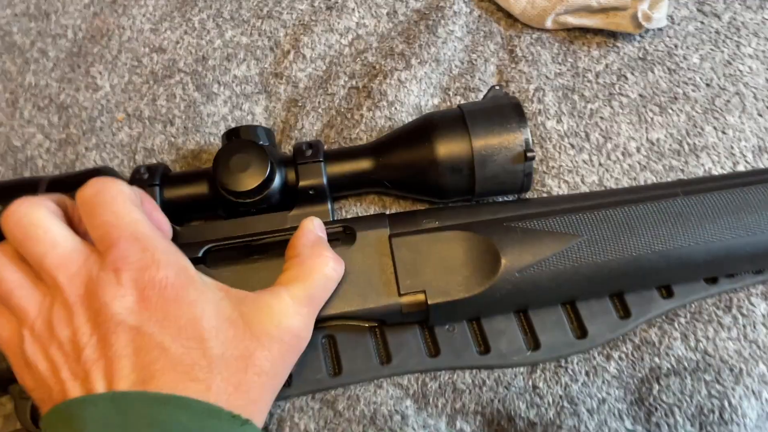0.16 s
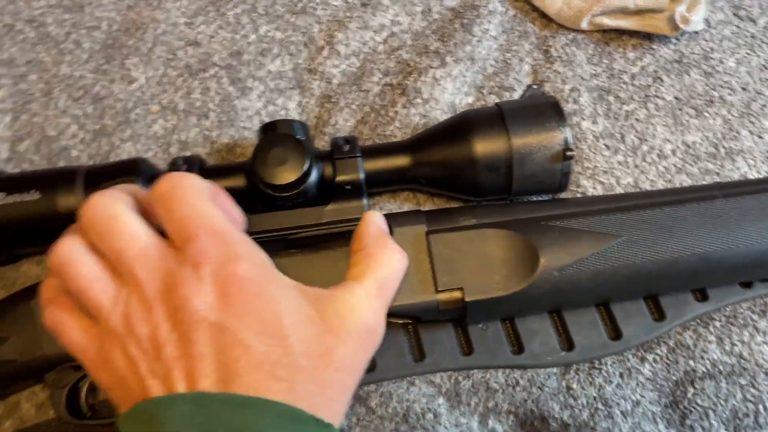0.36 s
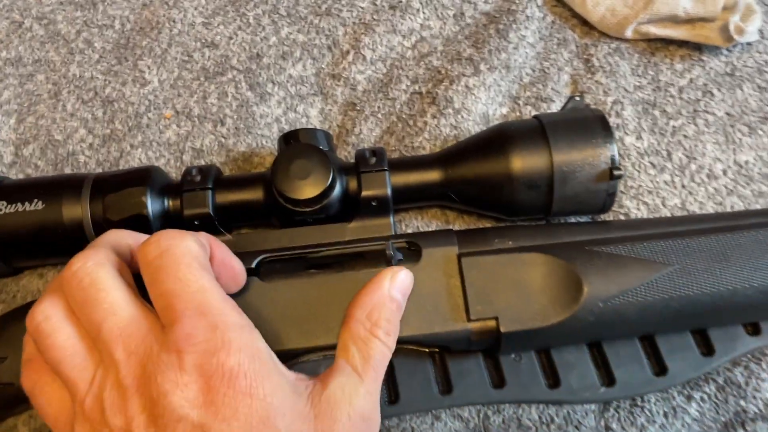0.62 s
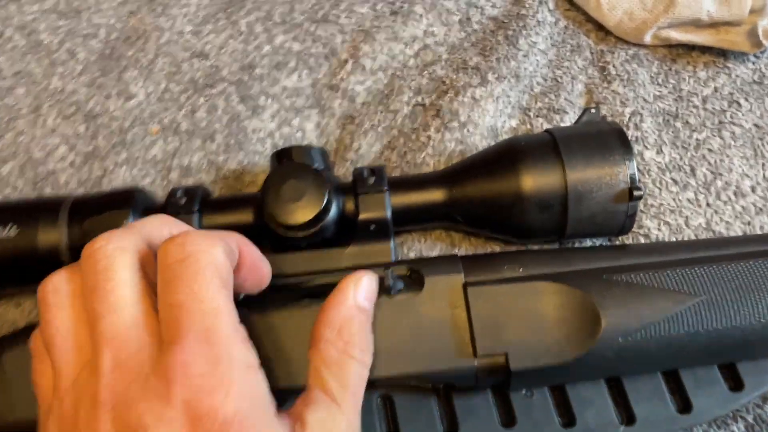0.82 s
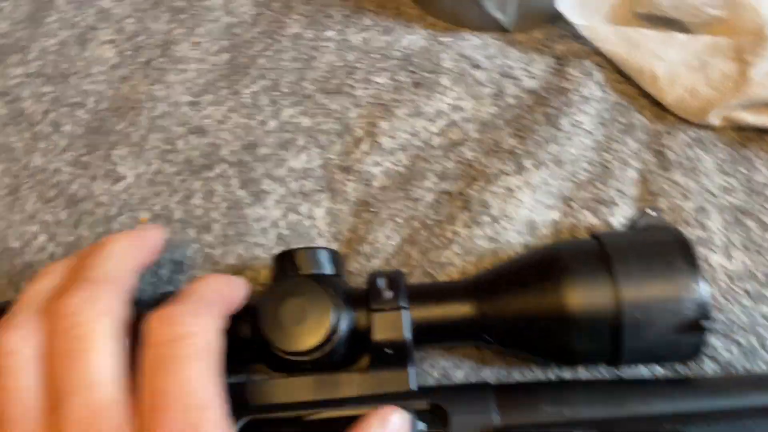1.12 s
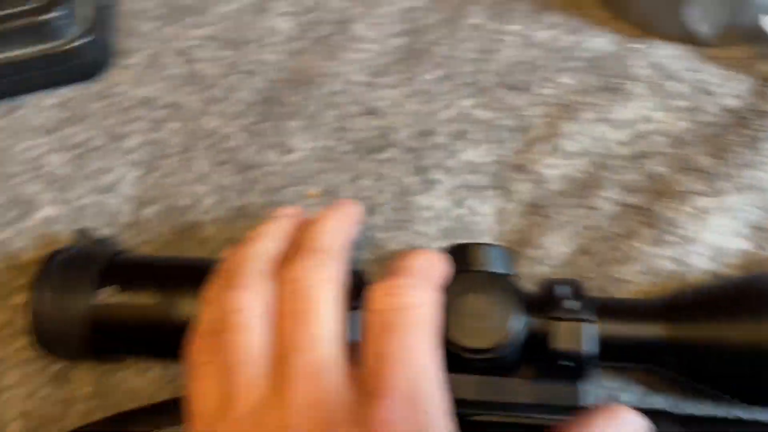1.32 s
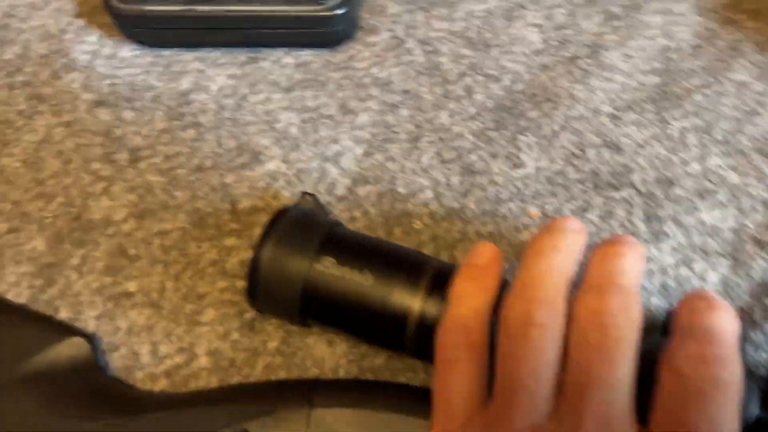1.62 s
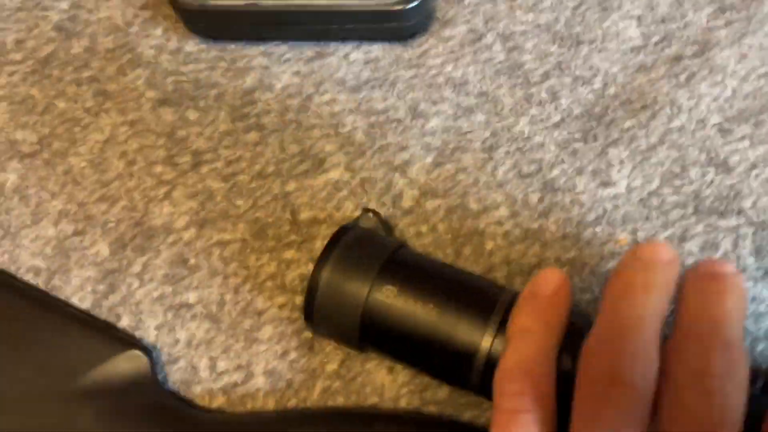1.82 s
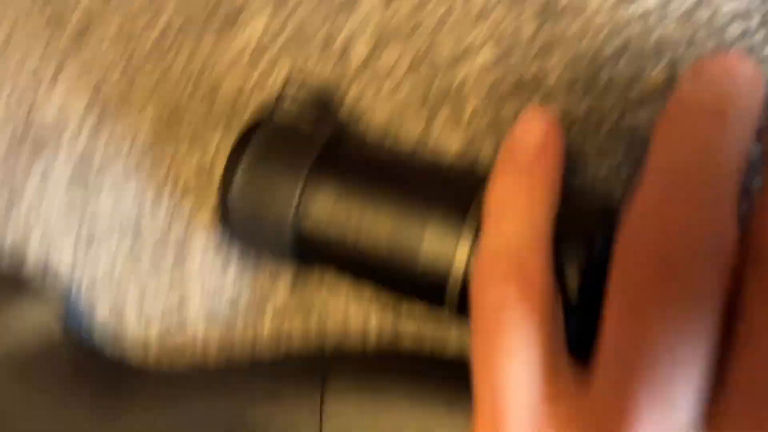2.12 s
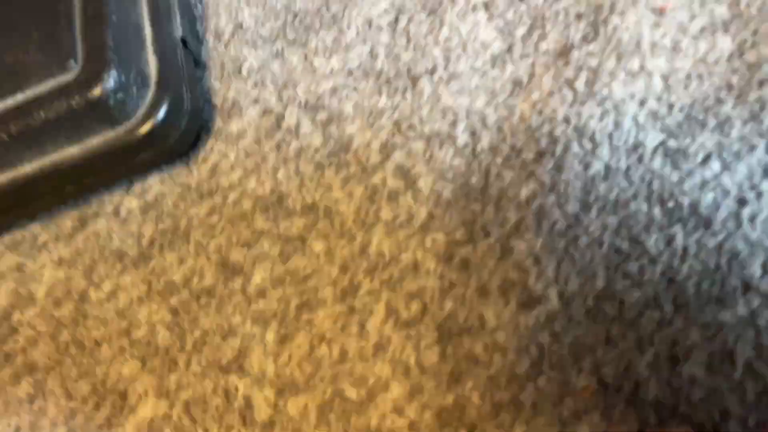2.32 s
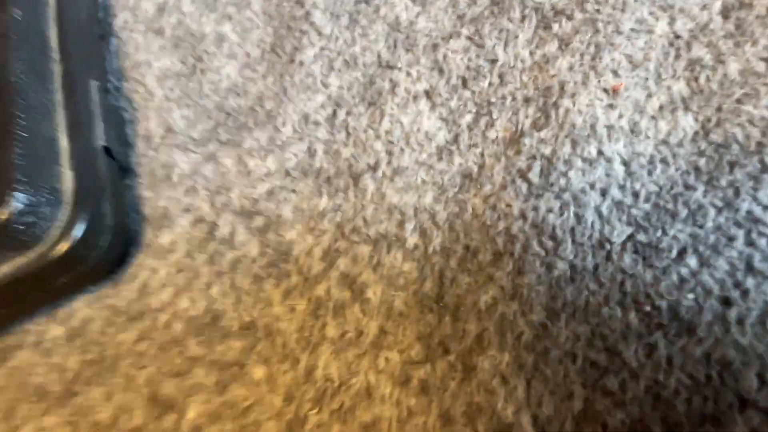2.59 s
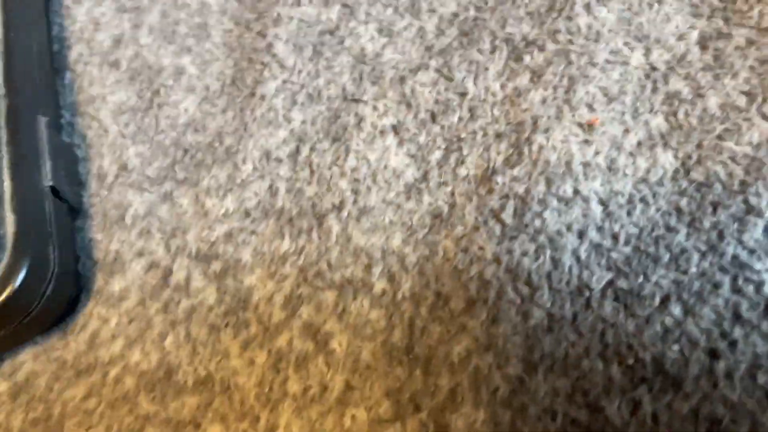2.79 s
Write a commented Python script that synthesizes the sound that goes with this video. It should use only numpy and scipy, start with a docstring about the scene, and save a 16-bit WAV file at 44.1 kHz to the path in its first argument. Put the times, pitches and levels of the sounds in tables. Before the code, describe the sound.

A rifle's bolt slides and slams shut very close to the microphone, steel ringing briefly; quiet handling follows, then knocks, rattling and scraping as it is lifted, ending in two hard clacks in a small carpeted room.

```python
"""A rifle is handled on a carpet, close to a phone in a small room. The bolt slides forward and slams shut,
its steel ringing on; a hand shifts its grip, then the rifle is lifted with loose knocks, a scrape and two hard clacks.
Each contact is a few milliseconds of noise chatter filtered by the rifle's resonances. Scrapes are grainy noise,
thuds and loose ticks are fading sines, and a noise-built room and a quiet noise floor lie behind.
The loudest contacts overload the microphone."""
import sys
import numpy as np
from scipy import signal
from scipy.fft import rfft, irfft, next_fast_len
from scipy.io import wavfile

SR = 44100
rng = np.random.default_rng(int(sys.argv[2]) if len(sys.argv) > 2 else 0)


def waveform_to_disk(signal):
    """Save audio, clipped to [-1, 1], as 16-bit WAV at the path in sys.argv[1]."""
    frames = np.transpose(np.atleast_2d(signal))
    scaled = np.clip(frames, -1, 1) * 32767
    samples = np.round(scaled).astype(np.int16)
    wavfile.write(sys.argv[1], SR, samples)


N = 130095

# centres of the five bands that set the tone of every contact and scrape: centre_hz [Hz]
BANDS_HZ = [250, 1300, 3200, 6500, 13000]


# clicks of the action: start_s [s], contact_s [s], spot_hz [Hz],
# then level_db [dB] in each of the five bands, before the resonances
ACTION_CLICKS = [ (.1020, 0.0029, 1820, -14.5, -11, -6, -14.5, -12.5),
                 (.1120, .012, 1080, -7.5, -11, -19.5, -26.5, -28),
                 (.1370, 0.0019, 4320, -20, -25.5, -22, -27, -26),
                 (.1920, 0.004, 3850, -15, 2, -3, -13.5, -12.5),
                 (.2348, 0.006, 1720, 7.5, 17, 14, 14.5, 12.5),
                 (.2362, 0.0024, 4520, 13.5, 20.5, 19.5, 19.5, 18),
                 (.2392, 0.0029, 1080, 13, 16.5, 13, 13.5, 16),
                 (.7670, 0.0021, 1950, -10.5, -21, -30, -78, -47.5)]
# broad resonances of the receiver: centre_hz [Hz], width_hz [Hz], lift_db [dB]
RECEIVER = [(1020, 220, 6), (1710, 380, 10.5), (3850, 420, 10), (4408, 350, 6.5), (5200, 250, 4),
            (6770, 680, 8)]


def bolt_action():
    """Clicks and the slam of the bolt, coloured by the receiver, with the strongest steel ring."""
    return contacts(ACTION_CLICKS, RECEIVER, ring_db=-13.5, spot_db=6)


# knocks of loose parts as the rifle is lifted: start_s [s], contact_s [s], spot_hz [Hz],
# then level_db [dB] in each of the five bands, before the resonances
KNOCKS = [ (1.823, 0.0041, 1774, -10, -22.5, -32.5, -28, -39.5),
          (1.950, 0.0057, 1088, -13.5, -22, -37, -39, -36), (2.1745, 0.0034, 2554, 4, 1, 1, -5.5, -21),
          (2.1830, 0.0026, 4580, -2, -8, -2, 1, -19), (2.2135, 0.031, 1870, -20, 2.5, -4, -1.5, -14),
          (2.2422, 0.0039, 3060, 6, 7.5, 6.5, 9, 2.5), (2.3505, 0.0033, 2620, -26, -2.5, 0, 0.5, -26),
          (2.3548, 0.0094, 810, -15, 2.5, 5, -9, -14), (2.3625, 0.0059, 3800, -2, 7.5, 7.5, -4.5, -19),
          (2.4025, 0.0075, 2110, -28, 9, -4.5, 1.5, -9), (2.4155, 0.0045, 1360, -19, 10, -3.5, 3, -21),
          (2.4415, 0.0014, 1770, -13, 7, -4.5, -18, -12.5), (2.5112, 0.0046, 1350, 9, 5, -4, 6.5, 0)]
# broad resonances of the stock: centre_hz [Hz], width_hz [Hz], lift_db [dB]
STOCK = [(916, 120, 13), (1986, 340, 10), (2617, 360, 8), (3730, 280, 9.5), (8900, 1200, -15)]


def loose_knocks():
    """Loose parts knock, coloured by the stock, with only a faint steel ring."""
    return contacts(KNOCKS, STOCK, ring_db=-39, spot_db=8)


# contacts of the two hard clacks: start_s [s], contact_s [s], spot_hz [Hz],
# then level_db [dB] in each of the five bands, before the resonances
CLACKS = [(2.5993, 0.0016, 4250, 15, 22.8, 16, 23, 21.5), (2.6705, 0.0027, 1800, 11, 15, 5.1, 9, 5.7),
          (2.6732, 0.004, 1420, 15, 22.2, 15.8, 21.8, 16.9), (2.6768, 0.0015, 260, 22, 13, 8.6, 15, 10)]
# broad resonances of the latch: centre_hz [Hz], width_hz [Hz], lift_db [dB]
LATCH = [(1104, 67, 5.5), (1420, 280, 2.5), (2766, 220, 12), (3927, 260, 7.5), (4330, 350, 3.5),
         (6060, 99, 7.5), (7247, 580, 10.5), (9100, 790, -45), (12330, 900, 5)]


def hard_clacks():
    """Hard, bright contacts coloured by the latch, with some steel ring."""
    return contacts(CLACKS, LATCH, ring_db=-23, spot_db=7)


# ring of the steel: pitch_hz [Hz], t60_s [s], level_db [dB] before each source's ring_db
STEEL = [(1068, 0.35, -53.5), (1124, 0.24, -54), (1595, 0.48, -54.5), (1655, 0.34, -52), (1750, 0.31, -55),
         (2261, .22, -52.5), (2762, .2, -53.5), (3770, 0.33, -55), (3895, 0.44, -56), (4255, 0.3, -57.5),
         (5530, 0.27, -54.5), (6719, 0.2, -55), (10864, 0.25, -45.5)]
RING_BLUR_HZ = 13  # loose joints blur each line of the ring by this much


def steel_ring(ring_db):
    """Fading sines with wandering phase: the response of the steel to a contact."""
    t = np.arange(SR // 2) / SR
    steps = rng.standard_normal((len(STEEL), len(t)))
    drift = np.cumsum(steps, axis=1) * np.sqrt(2 * np.pi * RING_BLUR_HZ / SR)
    ring = np.zeros(len(t))
    for (hz, t60, db), wander in zip(STEEL, drift):
        ring += undb(db + ring_db) * fade(t, t60) * np.sin(2 * np.pi * hz * t + wander)
    return ring[None]


RIPPLE_DB, RIPPLE_HZ = 2.5, 255.9  # spread and spacing of the many lesser resonances
SPOT_WIDTH = .16  # width of the struck spot's resonance, relative to its pitch


def contacts(rows, body, ring_db, spot_db):
    """Each contact chatters into the body at its own spot and sets the steel ringing."""
    out = np.zeros((2, N))
    ripple_hz = np.arange(1, SR / 2, RIPPLE_HZ)
    weaker_in_bass = np.minimum(ripple_hz / 3000, 1)
    for start, length, hz, *db in rows:
        ripple = RIPPLE_DB * rng.standard_normal(256)[:len(ripple_hz)] * weaker_in_bass
        spot = [(hz, hz * SPOT_WIDTH, spot_db)]
        burst = colour(chatter(length), zip(ripple_hz, ripple), spot)
        add(out, start - ONSET_RISE_S, colour(burst, zip(BANDS_HZ, db), body))
    return stereo(out + convolve(out, steel_ring(ring_db)))


ONSET_RISE_S, ONSET_DB = .0012, -4  # each contact swells briefly before its peak


def chatter(length, size=4096):
    """A short rise, then a burst of tiny collisions; nearly even spectrum and unit energy."""
    t = np.arange(size) / SR - ONSET_RISE_S
    onset = undb(ONSET_DB) * (1 + t / ONSET_RISE_S)
    after = np.exp(-(t / length) ** 2) + .1 * np.exp(-abs(t) / (2 * length))
    shape = np.where(t < 0, onset, after) + 1e-9
    x = rng.standard_normal((2, size)) * shape
    for _ in range(2):  # flatten the spectrum, then pull the energy back into the burst
        spectrum = rfft(x)
        x = irfft(spectrum / (abs(spectrum) + 1e-12)) * np.sqrt(shape)
    return x / np.sqrt((x ** 2).sum(1, keepdims=True))


# sliding of metal, hand and cloth; the first row is the fading tail of an earlier click:
# start_s [s], rise_s [s], hold_s [s], t60_s [s],
# then level_db [dB] in each of the five bands, before the resonances
RUBS = [ (0, 0.0005, 0.0064, 0.2, -37.5, -39.5, -40, -36, -67),
        (.196, 0.025, 0.024, 0.12, -34.5, -18, -35, -27.5, -45),
        (0.221, 0.0047, 0.0082, 0.089, -29, -15.5, -18, -19.5, -31),
        (.58, 0.082, 0.2, .5, -44.5, -67.5, -67.5, -83, -66),
        (1.26, .02, .03, 0.14, -43, -57, -60, -77.5, -77),
        (1.505, 0.0023, 0.013, 0.66, -41.5, -44.5, -41, -40.5, -52.5),
        (1.696, 0.0017, 0.0028, 0.44, -44.5, -46.5, -45, -47.5, -65),
        (1.931, 0.024, 0.57, .2, -41.5, -63.5, -60.5, -66.5, -65),
        (2.164, 0.0047, 0.089, 0.046, -27, -29.5, -34, -42, -48),
        (2.346, 0.013, 0.092, 0.23, -26.5, -27.5, -36.5, -31, -41),
        (2.464, 0.012, 0.033, 0.28, -18, -23.5, -24, -28, -25),
        (2.552, 0.018, 0.113, .08, -23.5, -22.5, -25.5, -20, -23),
        (2.78, 0.0093, 0.075, 0.49, -41.5, -43.5, -47, -40.5, -61)]
# broad resonances of the scrapes: centre_hz [Hz], width_hz [Hz], lift_db [dB]
SCRAPE_PEAKS = [(1096, 250, 4), (1850, 540, 3.5), (5923, 970, -5.5), (8560, 2200, -17)]
GRAIN_DB, GRAIN_HZ = 1.5, 599.4  # unevenness and rate of the catches in a scrape


def rubs():
    """Sliding surfaces catch and slip in dense uneven grains; the opening click tail is the same grainy noise."""
    out = np.zeros((2, N))
    t = np.arange(SR * 3 // 4) / SR
    for start, rise, hold, t60, *db in RUBS:
        catch = undb(GRAIN_DB * rng.standard_normal(len(t)))[(t * GRAIN_HZ).astype(int)]
        grains = rng.standard_normal((2, len(t))) * catch / np.sqrt(np.mean(catch ** 2))
        shape = np.minimum(t / rise, 1) * fade(t - rise - hold, t60)
        add(out, start, colour(grains * shape, zip(BANDS_HZ, db), SCRAPE_PEAKS))
    return stereo(out)


RATTLE_S, RATTLE_PER_S = (2.37, 2.67), 160  # span of the rattle in s, ticks per second
RATTLE_DB, RATTLE_SCATTER_DB = -34, 5  # softest tick, and how far the others rise above it
RATTLE_HZ, RATTLE_T60_S = (901, 4270), 0.035  # range of pitches, and how long each rings


def rattle():
    """Small loose parts tick at random during the lift, each ringing briefly at its own pitch."""
    out, t = np.zeros((2, N)), np.arange(SR // 10) / SR
    ticks = int(RATTLE_PER_S * (RATTLE_S[1] - RATTLE_S[0]))
    for when, pitch, size, *phases in rng.random((ticks, 5)):
        hz = RATTLE_HZ[0] * (RATTLE_HZ[1] / RATTLE_HZ[0]) ** pitch
        strength = undb(RATTLE_DB + RATTLE_SCATTER_DB * min(-np.log(1 - size), 2))
        tone = np.sin(2 * np.pi * (hz * t + np.array(phases)[:, None]))
        ring = tone * fade(t, RATTLE_T60_S) * np.minimum(t * hz, 1)  # rises within one cycle
        add(out, np.interp(when, (0, 1), RATTLE_S), strength * ring)
    return stereo(out)


# soft bumps of hand and stock: start_s [s], length_s [s] (twice the time to the peak), level_db [dB]
BUMPS = [(0.059, 0.055, -47), (0.143, 0.028, -47), (0.243, 0.028, -35), (0.307, 0.05, -50.5),
         (0.556, 0.044, -44), (0.649, 0.102, -54), (0.761, 0.04, -49), (0.92, 0.041, -50.5),
         (1.02, 0.072, -58), (1.267, 0.033, -54.5), (1.512, 0.26, -61.5), (1.973, 0.026, -52.5),
         (2.12, 0.025, -49), (2.5, 0.072, -43), (2.868, 0.048, -52.5)]
# dull tone of the bumps: freq_hz [Hz], level_db [dB] before each bump is levelled
BUMP_COLOUR = [(20, -13), (50, 6), (110, 2.5), (200, -7.5), (330, -4), (550, -24), (1500, -43),
               (5000, -68.5)]


def bumps():
    """Dull bumps of hand and stock: low rumble that swells and dies away."""
    out, t = np.zeros((2, N)), np.arange(SR // 2) / SR
    for start, length, db in BUMPS:
        rumble = colour(rng.standard_normal((2, len(t))), BUMP_COLOUR)
        u = 2 * t / length
        add(out, start, rumble / rumble.std() * undb(db) * u * np.exp(1 - u))
    return stereo(out)


# the stock meets the carpet: start_s [s], pitch_hz [Hz], t60_s [s], level_db [dB]
THUDS = [(1.815, 100, 0.18, -31.5), (1.84, 81, 0.055, -24.5), (2.52, 150, 0.16, -30.5),
         (2.602, 198, 0.056, -19.5), (2.675, 280, 0.025, -12), (2.679, 101, 0.021, -14.5)]


def thuds():
    """The stock meets the carpet: low sines with a soft onset, quickly damped, the same left and right."""
    out, t = np.zeros((2, N)), np.arange(SR // 2) / SR
    for start, hz, t60, db in THUDS:
        soft_onset = 1 - np.exp(-t / 0.0018)
        thud = undb(db) * soft_onset * fade(t, t60) * np.sin(2 * np.pi * hz * t)
        add(out, start, thud[None])
    return out


# diffuse tail of the room: centre_hz [Hz], t60_s [s], level_db [dB]
ROOM = [(150, 0.12, -12.5), (500, 0.78, -19.5), (1320, 0.37, -12.5), (3200, 0.4, -11), (5800, 0.45, -12),
        (8700, 0.094, -9), (14000, 0.43, -12.5)]
EARLY_T60_S, EARLY_DB = .09, -15  # quick reflections from nearby things


def room(x):
    """Quick reflections from nearby things, plus a diffuse tail that fades at its own rate in each band."""
    t = np.arange(SR * 3 // 4) / SR
    size = 2 * next_fast_len(len(t) // 2 + 1)
    noise = rfft(rng.standard_normal((2, size)))
    onset = 1 - np.exp(-(t / 0.0038) ** 2)

    def decay(t60):
        """Soft onset and exponential fade, with unit energy."""
        shape = onset * fade(t, t60)
        return shape / np.sqrt(np.sum(shape ** 2))

    tail = np.zeros((2, len(t)))
    for k, (hz, t60, db) in enumerate(ROOM):
        share = curve([(row[0], j == k) for j, row in enumerate(ROOM)], size)  # crossfades into its neighbours
        tail += irfft(noise * share)[:, :len(t)] * undb(db) * decay(t60)
    early = undb(EARLY_DB) * rng.standard_normal((2, len(t))) * decay(EARLY_T60_S)
    return convolve(x, tail + early)


# spectrum of the quiet background: freq_hz [Hz], level_db [dB]
FLOOR = [(20, -58.5), (55, -39), (120, -45), (280, -50.5), (500, -51), (1200, -60), (2100, -56),
         (3500, -68), (7000, -68.5), (9000, -78), (12500, -61), (16000, -79)]


def background():
    """Steady noise, shaped by the floor's spectrum."""
    return stereo(colour(rng.standard_normal((2, N)), FLOOR))


# likeness of left and right: freq_hz [Hz], correlation [-1 to 1], left_lead_rad [rad]
LIKENESS = [(100, 0.84, 0.5), (280, 0.55, -1), (463, 1, -2), (1100, 0.37, -1.5), (2273, 0.45, 0),
            (3800, 0.35, 0.55), (7340, .5, -2), (12000, 0.8, 0.9)]


def stereo(pair):
    """Two unrelated sounds become left and right, partly alike and shifted in phase between the microphone ports."""
    size = 2 * next_fast_len(pair.shape[1] // 2 + 1)
    alike = np.clip(curve([(hz, c) for hz, c, _ in LIKENESS], size), -.95, .95)
    turn = np.exp(.5j * curve([(hz, lead) for hz, _, lead in LIKENESS], size))
    mid, side = rfft(pair, size) * np.sqrt([(1 + alike) / 2, (1 - alike) / 2])
    return irfft(np.array([(mid + side) * turn, (mid - side) / turn]))[:, :pair.shape[1]]


def undb(db):
    """Decibels to gain."""
    return 10 ** (np.asarray(db) / 20)


def fade(t, t60):
    """Exponential decay from t = 0, down 60 dB after t60 seconds."""
    return np.exp(-np.log(1000) * np.maximum(t, 0) / t60)


def curve(points, size):
    """(Hz, value) points joined on a log axis, for the bins of a transform."""
    hz, value = np.array(list(points), float).T
    bins_hz = np.maximum(np.fft.rfftfreq(size, 1 / SR), 1)
    return np.interp(np.log(bins_hz), np.log(hz), value)


def colour(x, points, peaks=()):
    """Causal minimum-phase filter from (Hz, dB) points and broad resonances."""
    size = 2 * next_fast_len(x.shape[-1] // 2 + 1024)
    f = np.fft.rfftfreq(size, 1 / SR)
    db = curve(points, size)
    for hz, width, lift in peaks:
        db = db + lift / (1 + (2 * (f - hz) / width) ** 2)
    cepstrum = irfft(np.log(undb(db)))
    cepstrum[1:size // 2] *= 2  # folding the cepstrum forward makes the filter causal
    cepstrum[size // 2 + 1:] = 0
    return irfft(rfft(x, size) * np.exp(rfft(cepstrum)))[..., :x.shape[-1]]


def add(out, start, x):
    """Mix x in at a time in seconds."""
    i = max(int(start * SR), 0)
    out[:, i:i + x.shape[1]] += x[:, :max(N - i, 0)]


def convolve(x, response):
    """Play x through a response."""
    return signal.fftconvolve(x, response, axes=1)[:, :N]


def scene():
    """The rifle, its room and a quiet background."""
    action, knocks, clacks = bolt_action(), loose_knocks(), hard_clacks()
    sliding = rubs() + rattle()
    room_send = action + undb(-4.5) * knocks + undb(-6) * clacks + undb(3.5) * sliding
    echo = room(room_send)
    return action + knocks + clacks + sliding + echo + bumps() + thuds() + background()


LOW_CUT_HZ, TOP_HZ = 35, 15500
CLIP_KNEE = 6  # higher bends later and harder


def record(dry):
    """The microphone thins the deepest bass, flattens the loudest peaks and cuts the top."""
    low_cut = signal.butter(2, LOW_CUT_HZ, "high", fs=SR, output="sos")
    thinned = signal.sosfilt(low_cut, dry)
    clipped = thinned / (1 + abs(thinned) ** CLIP_KNEE) ** (1 / CLIP_KNEE)
    top_cut = signal.ellip(8, .2, 60, TOP_HZ, fs=SR, output="sos")
    return signal.sosfilt(top_cut, clipped)


dry = scene()
out = record(dry)
waveform_to_disk(out)
```